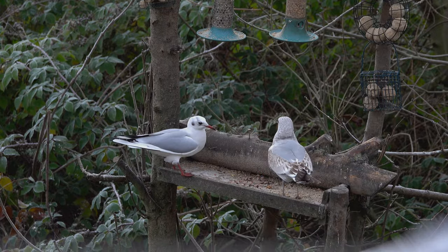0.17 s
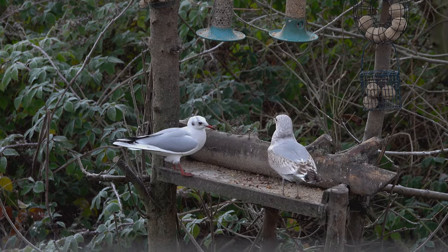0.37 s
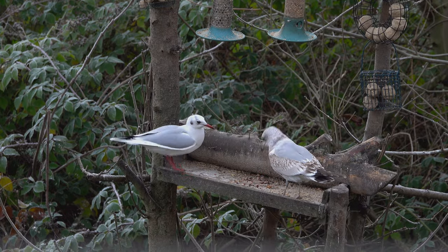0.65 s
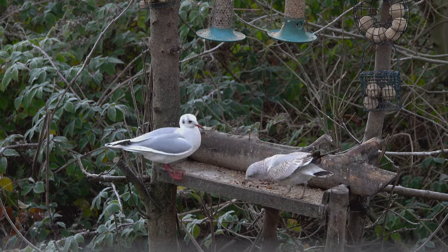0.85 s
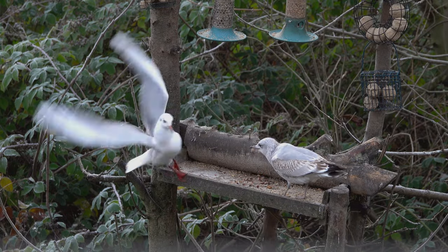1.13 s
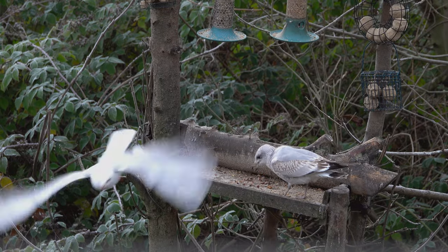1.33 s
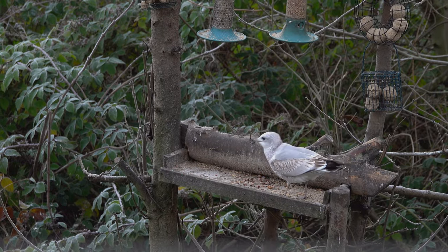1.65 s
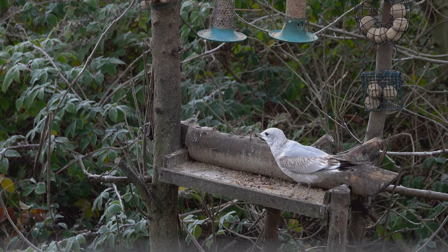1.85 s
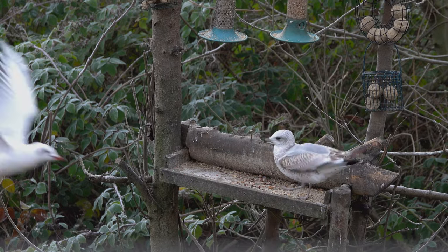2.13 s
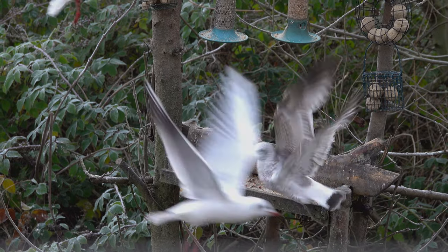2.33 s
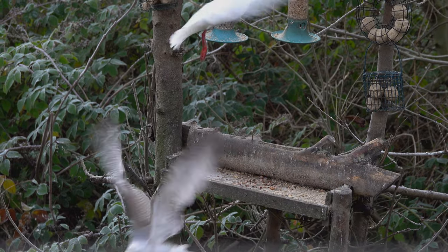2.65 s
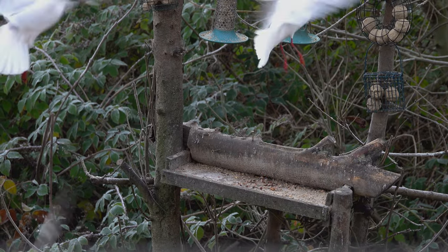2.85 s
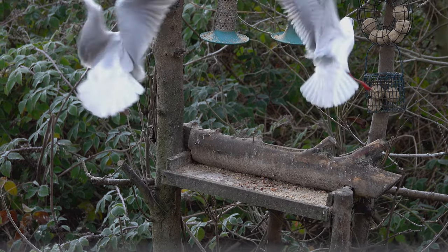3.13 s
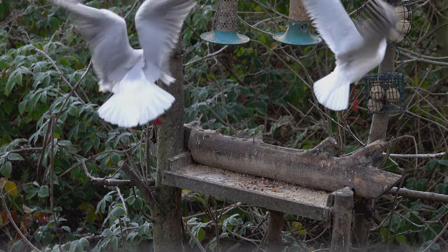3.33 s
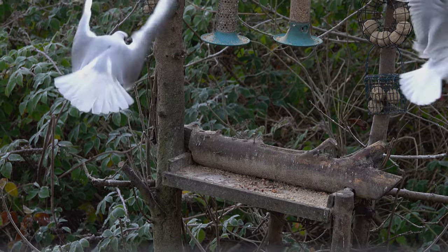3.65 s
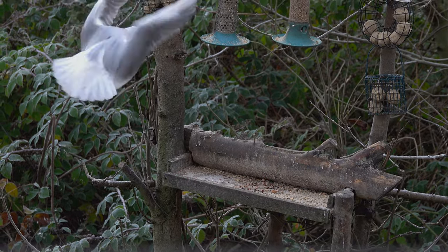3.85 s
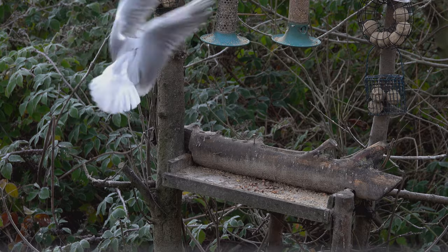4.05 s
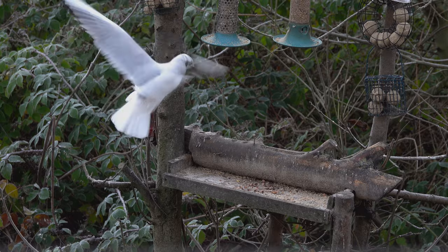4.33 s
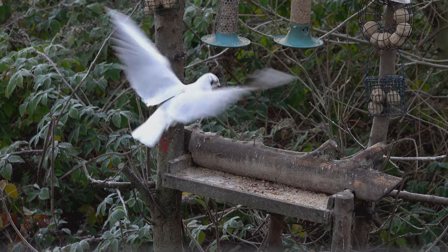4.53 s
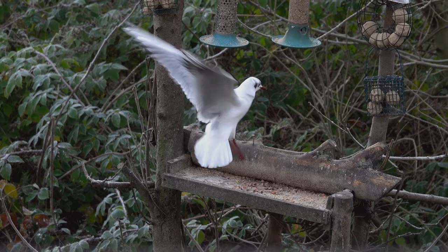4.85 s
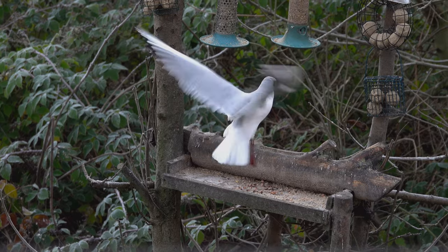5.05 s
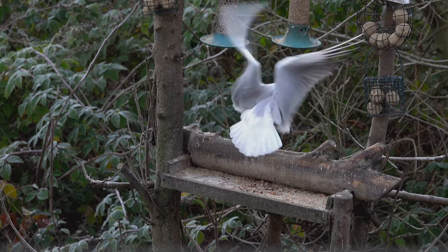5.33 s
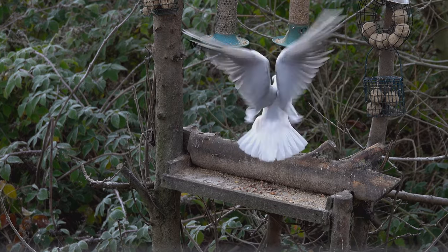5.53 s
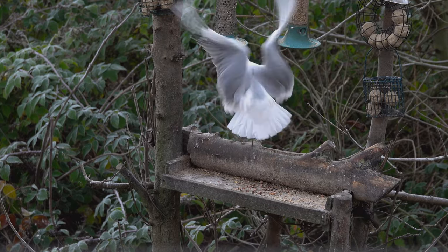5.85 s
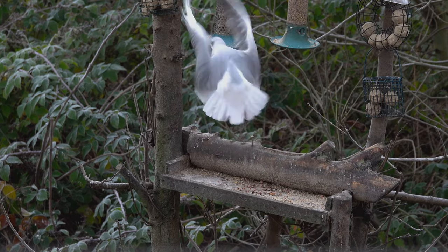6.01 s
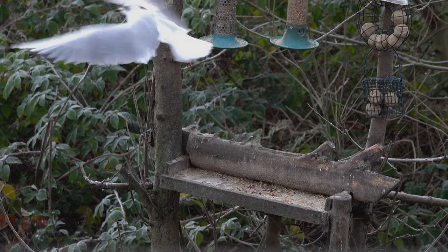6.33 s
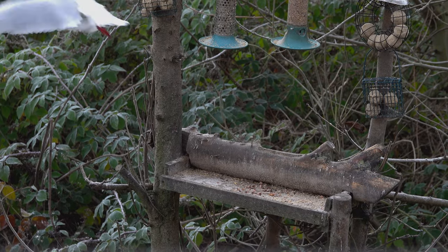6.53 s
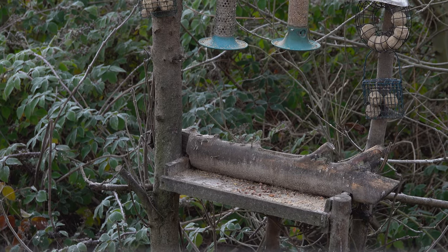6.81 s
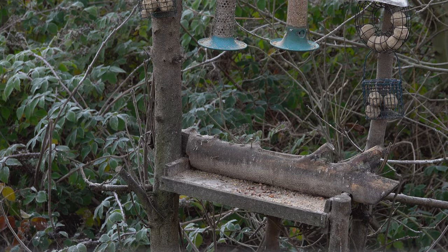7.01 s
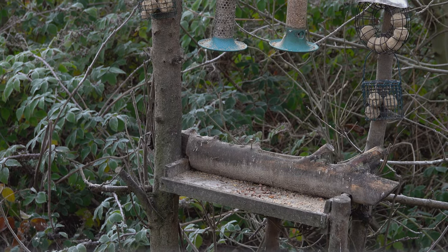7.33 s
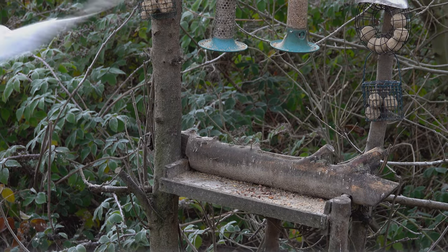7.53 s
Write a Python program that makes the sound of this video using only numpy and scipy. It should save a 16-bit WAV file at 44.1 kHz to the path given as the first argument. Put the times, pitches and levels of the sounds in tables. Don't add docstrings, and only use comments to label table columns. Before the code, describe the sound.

Gulls at a garden feeding table, fairly close, with short outdoor reflections. A young bird's squeal is already under way at 0 s and drops through lower notes to a quaver by 0.35. It squeals again at 0.7 and, louder, at 1.8, each time arching high then stepping down by 1.4 and 2.4; a short stub comes at 2.9. Dry rattling kek bursts run through, strongest around 2.0-2.2, duller from 3.5 to 5, clearer again until 6. Small wooden ticks fall at 1.7, 2.5, 2.6 and 2.9, fainter later. From 3.2 adults scream harsh, throbbing arched cries every 0.3-0.5 s, the first few cracking upward. Two lower ones come at 6.7 and 7.1, then the voice breaks into the loudest, longest cry at 7.4, lasting to the end. Soft mews and a distant flock swell after 6; faint engine drone fades by 4.5 beneath rumble and hiss.

```python
import sys
import numpy as np
from scipy import signal
from scipy.fft import rfft, irfft
from scipy.io import wavfile
from scipy.ndimage import uniform_filter1d

SR = 44100
rng = np.random.default_rng(int(sys.argv[2]) if len(sys.argv) > 2 else 0)


def gain_from_db(level_db):
    decades = np.asarray(level_db, float) / 20
    return 10 ** decades


def materialize(psi):
    bounded = np.clip(np.atleast_2d(psi).T, -1, 1)
    quanta = np.round(bounded * 32767).astype(np.int16)
    wavfile.write(sys.argv[1], SR, quanta)


N = 338247


def rms_one(x):
    return x / np.sqrt(np.mean(np.abs(x) ** 2) + 1e-20)


def at_hz(points, hz):
    return np.interp(np.log(hz), np.log(np.array(points)[:, 0]), np.array(points)[:, 1])


def in_time(rows):
    return np.interp(np.arange(N) / SR, *np.transpose(rows))


def drift(hz, size, count=1):
    pole, run_in = np.exp(-2 * np.pi * hz / SR), int(SR / hz)
    white = rng.standard_normal((count, size + run_in))
    return rms_one(signal.lfilter([1], [1, -2 * pole, pole * pole], white)[:, run_in:])


def coloured(points):
    hz = np.maximum(np.arange(N // 2 + 1) * SR / N, 1)
    return irfft(rfft(rng.standard_normal(N)) * gain_from_db(at_hz(points, hz)), N) * np.sqrt(SR / 2)


def low_pass(x, hz):
    return signal.sosfilt(signal.butter(4, hz, fs=SR, output="sos"), x)


def add(out, start_s, sound):
    i = round(start_s * SR)
    out[i:i + len(sound)] += sound[:N - i]


def cry(rows, throat, throb_hz, depth, rough, half_db, bill_db=0., peak_hz=2000, peak_db=0.,
        edge_s=0.0016, catches=(), drag=0.0748):
    s, pitch, level_db = np.transpose(rows)
    t = np.arange(s[0], s[-1], 1 / SR)
    pitch, level = [uniform_filter1d(np.interp(t, s, curve), size=700, mode="nearest")
                    for curve in (pitch, gain_from_db(level_db))]
    catch = sum(np.exp(-((t - c) / 0.00336) ** 2) for c in catches)

    turn = np.cumsum(throb_hz * (1 + 0.046 * drift(25, len(t))[0])) / SR
    turn = (turn + .35) % 1
    puff = np.sin(np.pi * turn ** 1.207) ** .52
    wobble = rough * 0.0336 * drift(150, len(t)) + depth * drag * (puff - .75) - 0.073 * catch
    phase = np.pi * np.cumsum(pitch * (1 + wobble)) / SR

    step = 1 if half_db > -40 else 2
    k = np.arange(step, 2 * throat[-1][0] // pitch.max(), step)[:, None]
    hz = k * pitch / 2
    bill = bill_db / (1 + (3200 / hz) ** 8)
    peak = peak_db / (1 + ((hz - peak_hz) / 260) ** 2)
    gain = gain_from_db(at_hz(throat, hz) + bill + k % 2 * half_db + peak)

    unrest = rough * 0.75 * (1 - 0.24 * gain / gain.max(0))
    noise = drift(260, len(t), count=len(k))
    whole = (1 + unrest * noise) / np.sqrt(1 + unrest ** 2)
    ragged = np.where(k % 2, 0.43 + 0.59 * noise, whole)
    sound = (gain * ragged * np.sin(k * phase + k * k)).sum(0) / np.sqrt((gain ** 2).sum(0) / 2)

    fade_in = t - s[0] + (s[0] == 0)
    fade_out = s[-1] - t + (s[-1] * SR > N - 9)
    edges = np.clip(np.minimum(fade_in, fade_out) / edge_s, 0, 1)
    return sound * rms_one(1 - depth + depth * puff) * level * gain_from_db(-6 * catch) * edges


def young_bird():
    # frequency in Hz, level in dB.
    young_throat = [(300, -21.5), (800, -30.5), (1300, -15.5), (1750, 6), (2150, -5.5), (2600, -7),
                    (3000, -19.5), (3550, -3.5), (4250, -10), (4800, -30), (5400, -33.5), (6500, -59.5),
                    (8000, -47.5), (9500, -70.5)]
    voice_catches = [0.745, 0.802, 0.898, 1.896]
    # start in seconds, length in s, top pitch in Hz, time to the top in s, level in dB.
    high_notes = [
        (0.709, 0.24, 887.4, .1, -30),
        (1.827, 0.2, 885, 0.035, -27),
        (2.939, .152, 855, 0.0215, -35),
    ]
    # start in seconds, length in s, pitch in Hz, sag in Hz per s, level in dB.
    register_steps = [
        (0.077, 0.083, 520, 700, -35.5),
        (0.16, .1, 380, -200, -41.5),
        (0.264, .075, 334, 497, -48),
        (0.944, 0.19, 631, 430.5, -34.5),
        (1.127, 0.14, 467, 201, -40),
        (1.266, 0.13, 341.8, 198, -43.5),
        (2.026, .134, 595, 230, -32.5),
        (2.161, 0.15, 464.4, 317.5, -38.5),
        (2.302, 0.13, 321, 275, -40.5),
        (3.094, 0.042, 595, 100, -44),
    ]
    # time in seconds, pitch in Hz, level in dB.
    opening = [
        (0.0, 547, -35.5),
        (0.034, 503, -39.5),
        (0.075, 533, -36),
    ]
    run_up_s, run_up_share, run_up_db = 0.039, .78, -15
    high_start_share, high_sag_share, high_fade_db = 0.97, .1, 4.5
    slip_s, slip_share, slip_db = 0.0347, .13, -2.5
    quaver_hz, quaver_share = 15, 0.032
    out = np.zeros(N)

    def note(rows, climbing=0, narrow_db=0., middle_db=-2.5):
        start_s = rows[0][0]
        rough = 0.02 + 0.65 * climbing + 0.18 * (rows[-1][1] < 345)
        bill_db = 10.5 - 8 * start_s + narrow_db
        add(out, start_s, cry(rows, young_throat, 60, .3 * climbing, rough, -60, bill_db, peak_hz=2580,
                              peak_db=middle_db - 4 * start_s, edge_s=0.00057, catches=voice_catches))

    for s, length, hz, top_s, db in high_notes:
        run_up = [(s - run_up_s, run_up_share * hz, db + run_up_db),
                  (s - run_up_s / 2, .92 * hz, db - 3.5),
                  (s - .002, high_start_share * hz, db - 1.5)]
        note(run_up, climbing=0.93, middle_db=9)
        fall = np.linspace(0, 1, 5)
        times = s + top_s + fall * (length - top_s)
        sagging = zip(times, hz * (1 - high_sag_share * fall ** 1.3), db - high_fade_db * fall)
        note([(s, high_start_share * hz, db - 1.5), *sagging], narrow_db=1, middle_db=6.5)
    note(opening)
    for s, length, hz, sag, db in register_steps:
        held = max(length - slip_s, length / 2)
        t = np.linspace(0, length, num=16)
        slip = np.clip((t - held) / (length - held), 0, 1)
        quaver = 1 + quaver_share * (hz < 360) * np.cos(2 * np.pi * quaver_hz * t)
        pitch = (hz - sag * np.minimum(t, held)) * (1 - slip_share * slip) * quaver
        note(list(zip(s + t, pitch, db + slip_db * slip)))
    return out


def adults():
    # frequency in Hz, level in dB.
    adult_throat = [(300, -50.5), (600, -21.5), (1000, -15.5), (1400, 0.5), (2100, -3.5), (2700, -3.5),
                    (3300, -18), (4100, -8), (4900, -13), (5500, -29), (6300, -40.5), (7200, -54.5),
                    (8700, -44), (9800, -57)]
    # start in seconds, climb in s, length in s, top pitch in Hz, level in dB.
    screams = [(3.216, .054, 0.15, 949, -30.5), (3.689, .064, 0.14, 993, -25.5),
               (4.16, .069, 0.15, 910, -26.5), (4.548, .116, 0.23, 820, -24), (4.956, .09, 0.25, 1011, -24),
               (5.369, .045, 0.22, 1028, -26.5), (5.715, .05, .21, 1044, -25.5),
               (6.053, .058, 0.21, 1009, -24.5), (6.391, 0.074, .215, 999.4, -24),
               (6.745, 0.049, 0.23, 713, -25), (7.13, 0.081, 0.24, 699, -26), (7.432, .025, .37, 825, -21)]
    # throb in Hz, roughness 0-1, bill opening in dB, half-pitch lines in dB,
    # pitch drag of the throb 0-1.
    scream_voice = [(90.4, .5, 2, -6, .11), (88, .33, 0.5, -9, .11), (88, .38, 5, -3, .12),
                    (87.5, .4, 2.5, -7, .14), (88.8, .4, 2.5, -7, .15), (88.8, .4, -4, -10, .09),
                    (89.5, .38, -8.5, -12.5, .07), (91, 0.29, -9.5, -13, .07), (90.5, .38, 4, -7.5, .07),
                    (94.3, 0.44, 5.5, -11, .06), (91, 0.4, 5.5, -11.5, .05), (57.15, .5, -9, -8, .11)]
    cracked_peak_hz = [2400, 2110, 2210, 2315]
    # share of top pitch, level in dB.
    arch = [
        (.62, -20.5),
        (.94, -4),
        (0.97, 1),
        (0.94, -5.5),
        (.9, -21.5),
    ]
    # share of top pitch, level in dB.
    ramp = [
        (.78, -17.5),
        (.89, -3),
        (0.99, 0),
        (0.98, -2.5),
        (.88, -12.5),
    ]
    # start in seconds, length in s, from Hz, to Hz, level in dB.
    slides = [
        (3.83, .053, 782, 592, -34.5),
        (4.29, .083, 881, 626, -29.5),
    ]
    # time in seconds, pitch in Hz, level in dB.
    hook = [
        (7.39, 630, -31),
        (7.41, 660, -29),
        (7.42, 880, -27),
        (7.432, 900, -30),
        (7.445, 680, -30),
    ]
    crack_from, crack_at, crack_sag, crack_fade_db = .62, .86, 0.057, 5.5
    out = np.zeros(N)

    def scream(rows, throb_hz, rough, half_db, bill_db, peak_hz, drag):
        add(out, rows[0][0], cry(rows, adult_throat, throb_hz, .82, rough, half_db, bill_db, peak_hz,
                                 peak_db=15.5, drag=drag))

    for k, (timing, character) in enumerate(zip(screams, scream_voice)):
        s, climb, length, hz, db = timing
        throb_hz, rough, bill_db, half_db, drag = character
        if k < len(cracked_peak_hz):
            voice = throb_hz, rough, half_db, bill_db, cracked_peak_hz[k], drag
            scream([(s, crack_from * hz, db - 29),
                    (s + .5 * climb, .75 * hz, db - 4.5),
                    (s + climb, crack_at * hz, db - 1.0)], *voice)
            scream([(s + climb + 0.0022, hz, db - 0.5),
                    (s + climb + .03, hz, db),
                    (s + length, (1 - crack_sag) * hz, db - crack_fade_db)], *voice)
        else:
            shape, crest, shoulder = (ramp, .8, .93) if hz < 750 else (arch, .62, .9)
            times = s + np.array([0, climb, crest * length, shoulder * length, length])
            share, swell_db = np.transpose(shape)
            peak_hz = hz * round(2000 / hz)
            scream(list(zip(times, share * hz, db + swell_db)), throb_hz, rough, half_db, bill_db, peak_hz, drag)
    for s, length, hz, end_hz, db in slides:
        scream([(s, hz, db), (s + .85 * length, end_hz, db - 4.5), (s + length, end_hz, db - 21)],
               89, 0.67, -8.5, 2.0, 2150, .12)
    scream(hook, 45, .25, -18, -12, 1300, .05)
    return out


def rattles():
    # start in seconds, length in s, level in dB, pulse rate in Hz.
    bursts = [(0.046, 0.071, -29.5, 92), (0.29, 0.061, -33, 91), (0.5, 0.056, -37, 92),
              (0.764, 0.065, -30, 53), (1.037, 0.026, -31, 91), (1.082, 0.045, -31, 55),
              (1.261, 0.039, -30, 86), (1.726, 0.1, -31, 82), (1.983, 0.066, -26, 79),
              (2.202, 0.094, -25, 89), (2.433, 0.056, -29.5, 96), (2.906, 0.049, -30.5, 92),
              (3.113, 0.14, -28.5, 91), (3.323, 0.073, -31, 67), (3.519, 0.043, -33, 80),
              (4.019, 0.054, -34.5, 93), (4.821, 0.033, -34.5, 88), (5.28, 0.15, -34, 81),
              (5.554, 0.037, -27, 93), (5.694, 0.051, -31.5, 96), (5.785, 0.042, -30.5, 89),
              (6.025, 0.052, -30, 96)]
    # frequency in Hz, width in Hz, level in dB.
    throat_modes = [(1319, 270, -12), (1586, 87, 3), (2076, 107, 4.5), (2790, 125, -1.5), (3366, 228, -7),
                    (4400, 1100, -32)]
    away_from_s, away_to_s, away_hz, away_db = 3.45, 4.95, 2400, 3
    puffs = np.full(N, 1e-18)
    for start_s, length_s, level_db, pulse_hz in bursts:
        for s, luck in zip(np.arange(0, length_s, 1 / pulse_hz), rng.standard_normal((12, 382))):
            shape = np.sin(np.pi * (s + 0.011) / (length_s + 0.011)) ** 0.54
            beats = signal.square(np.arange(380) * 0.086 * (1 + .08 * luck[0]), .15)
            burst = np.hanning(380) * (beats + 0.86 * luck[2:])
            gain = shape * gain_from_db(level_db + 9 + 1.1 * luck[1])
            add(puffs, start_s - .004 + s + .0008 * luck[0], burst * gain)
    puffs = low_pass(puffs, 4800)
    away = slice(int(away_from_s * SR), int(away_to_s * SR))
    puffs[away] = gain_from_db(away_db) * low_pass(puffs[away], away_hz)
    out = np.zeros(N)
    for k, (hz, width_hz, db) in enumerate(throat_modes):
        out += (-1) ** k * gain_from_db(db) * signal.lfilter(*signal.iirpeak(hz, hz / width_hz, SR), puffs)
    return out


def ticks():
    # time in seconds, peak level in dB.
    knocks = [
        (1.71, -34),
        (2.4597, -35.5),
        (2.616, -39.5),
        (2.8886, -36),
        (3.9987, -45.5),
        (4.955, -47.5),
        (5.262, -47.5),
    ]
    out = np.zeros(N)
    for s, db in knocks:
        add(out, s, gain_from_db(db - 6) * rng.standard_normal(600) * np.exp(-np.arange(600) / 90))
    return signal.sosfilt(signal.butter(2, [1800, 5500], "band", fs=SR, output="sos"), out)


def mews():
    # frequency in Hz, level in dB.
    mew_throat = [(400, -8.5), (700, -1.5), (1100, -2.5), (2000, 2), (3000, -19), (4200, -10.5),
                  (6000, -37)]
    # start in seconds, length in s, top pitch in Hz, level of the lowest line in dB, crest share.
    arches = [
        (1.422, .11, 643, -58.5, 0.33),
        (3.039, 0.17, 662, -56.5, 0.61),
        (3.6, .12, 750, -51, .7),
        (3.801, 0.065, 602, -48.5, 0.67),
        (4.072, .1, 608, -57, .25),
        (5.414, .2, 689, -54.5, 0.47),
        (5.871, 0.24, 776, -51.5, 0.5),
    ]
    # start in seconds, length in s, from Hz, to Hz, level in dB.
    glides = [
        (0.0, 0.11, 1080, 894, -56),
        (0.14, .215, 811, 634, -58.5),
        (2.125, .05, 603, 1387, -46.5),
        (6.6, .33, 1077, 873, -42),
        (6.916, .215, 769, 560, -42.5),
    ]
    edge_share, edge_db = 0.82, -7.5
    shapes = []
    for s, length, hz, db, crest in arches:
        shapes.append([(s, edge_share * hz, db + edge_db),
                       (s + crest * length, hz, db),
                       (s + length, edge_share * hz, db + edge_db)])
    for s, length, hz, end_hz, db in glides:
        shapes.append([(s, hz, db - 4.5),
                       (s + length / 2, (hz + end_hz) / 2, db),
                       (s + length, end_hz, db - 4.5)])
    out = np.zeros(N)
    for rows in shapes:
        louder = np.add(rows, [0, 0, 6])
        add(out, rows[0][0], cry(louder, mew_throat, 60, 0.93, .48, -14, edge_s=0.007))
    return out


def far_flock():
    # frequency in Hz, level in dB per Hz.
    flock_spectrum = [(250, -39.5), (400, -20), (600, -9.5), (1000, -9), (1300, -8), (1700, -1),
                      (2100, -2.5), (2600, -9.5), (3300, -15.5), (4200, -13), (5000, -18.5), (5700, -31),
                      (7000, -47.5)]
    # time in seconds, level in dB.
    flock_level = [(0, -49), (.45, -54), (1.55, -55.5), (2.1, -51.5), (2.7, -54), (4.9, -51), (5.66, -52),
                   (5.95, -46.5), (6.3, -49), (6.7, -44), (7.1, -44), (7.67, -51.5)]
    calls = np.zeros(N)
    for s, length, pitch, db in rng.random((24, 4)) * [N / SR, .25, 400, 9] + [0, 0.03, 600, -9]:
        rows = [(s, .75 * pitch, db - 4.5), (s + length / 2, pitch, db), (s + length, .85 * pitch, db - 12.0)]
        add(calls, s, cry(rows, flock_spectrum, 80, 0.37, 0.54, -60, edge_s=0.053))
    wash = rms_one(coloured(flock_spectrum)) * gain_from_db(1.5 * drift(9, N)[0])
    return gain_from_db(in_time(flock_level)) * (0.4 * rms_one(calls) + 1.047 * wash)


def drone():
    # frequency in Hz, level in dB.
    engine_orders = [(80, -91.5), (98, -88), (163, -84.5), (195, -84.5), (261, -85), (292, -88)]
    # time in seconds, level in dB.
    engine_fade = [(0, 5), (3, 2), (4.5, -17.5), (7.67, -8.5)]
    t = np.arange(N) / SR
    lines = 0
    for hz, db in engine_orders:
        level = gain_from_db(db + 3.0 + 4.5 * drift(4.4, N))
        lines = lines + level * np.sin(2 * np.pi * hz * t + 2.0 * drift(6.0, N))
    return lines * gain_from_db(in_time(engine_fade)) * gain_from_db(np.array([[-9], [4]]))


def air():
    # frequency in Hz, level in dB per Hz.
    rumble_spectrum = [(20, -113), (60, -106), (120, -104), (300, -111), (900, -116), (3000, -130)]
    # frequency in Hz, level in dB per Hz.
    hiss_spectrum = [(1000, -125), (5000, -117), (7000, -116.5), (10000, -115.5), (12000, -107),
                     (14000, -105), (16000, -105.5)]
    # time in seconds, level in dB.
    hiss_rise = [(0, -74), (1.2, -71), (2.5, -68), (5.8, -70), (7.67, -66)]
    sides = np.array([[1], [-1]])
    lift_db = in_time(hiss_rise)
    rumble = coloured(rumble_spectrum) + .46 * sides * coloured(rumble_spectrum)
    hiss = coloured(hiss_spectrum) + 0.25 * sides * coloured(hiss_spectrum)
    return rumble * gain_from_db(4.8 * drift(7, N)) + hiss * gain_from_db(lift_db - lift_db.mean())


def garden(x):
    # delay in seconds, level in dB.
    echoes = [
        (.011, -11.5),
        (0.024, -14.5),
        (.047, -15.5),
        (.083, -27.5),
        (.131, -36),
    ]
    tail = rng.standard_normal((3, 9000)) * np.exp(-np.arange(9000) / 1900) * gain_from_db(-46.0)
    response = tail[0] + 0.2 * tail[1:]
    for s, db in echoes:
        response[:, round(s * SR)] += gain_from_db(db - 8.0)
    x = signal.sosfilt(signal.butter(4, 480, "high", fs=SR, output="sos"), x)
    dull = signal.lfilter([.45], [1, -.55], x)
    reflected = signal.oaconvolve(dull[None], response, axes=1)[:, :N]
    treble = signal.sosfilt(signal.butter(2, 7000, "high", fs=SR, output="sos"), np.roll(x, 9))
    return x + gain_from_db(-21) * treble * [[1], [-1]] + reflected


def scene():
    birds = young_bird() + adults() + rattles() + ticks() + mews() + far_flock()
    return garden(birds) + drone() + air()


def top_cut(x):
    return signal.sosfilt(signal.butter(12, 15790, fs=SR, output="sos"), x)


def record(dry):
    return top_cut(dry)


dry = scene()
out = record(dry)
materialize(out)
```